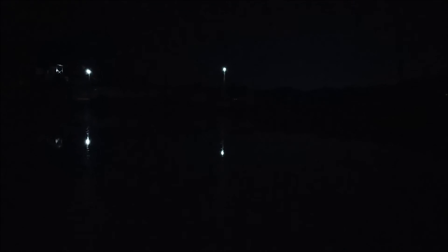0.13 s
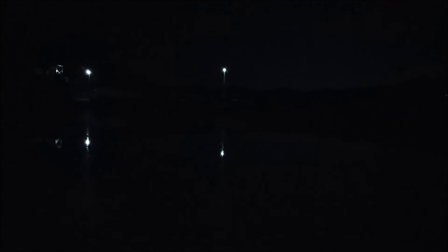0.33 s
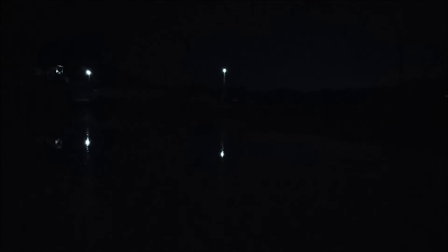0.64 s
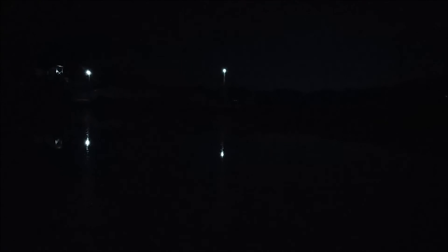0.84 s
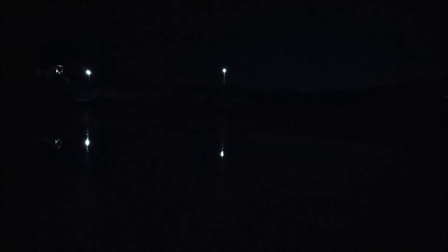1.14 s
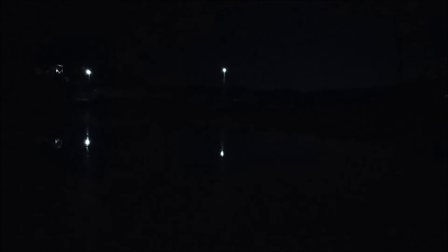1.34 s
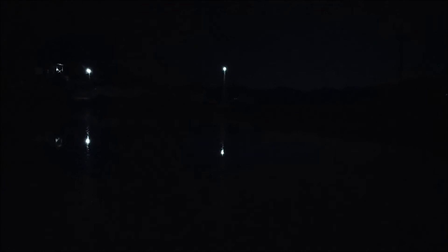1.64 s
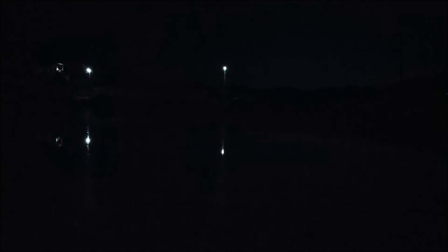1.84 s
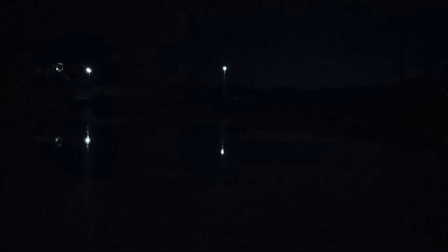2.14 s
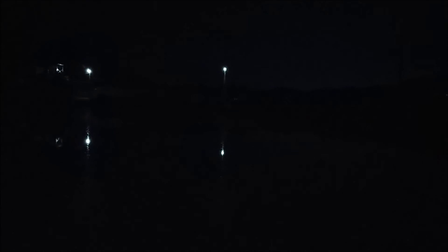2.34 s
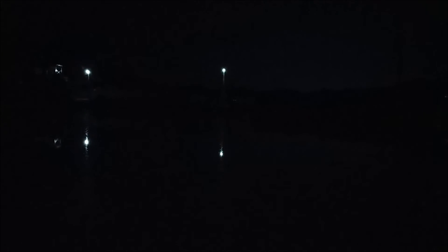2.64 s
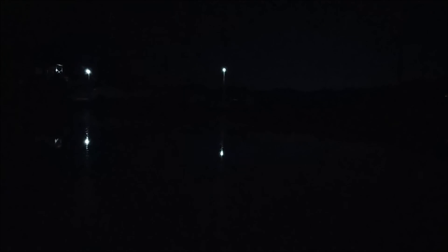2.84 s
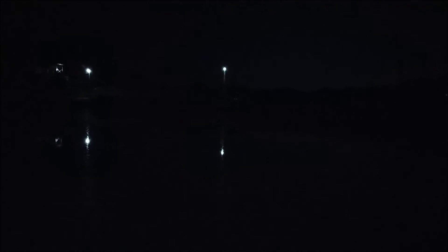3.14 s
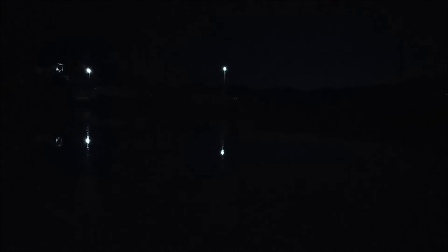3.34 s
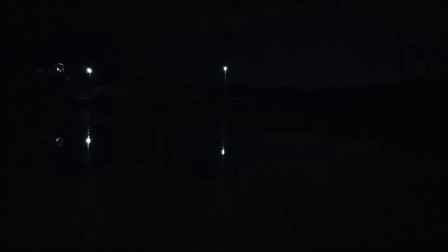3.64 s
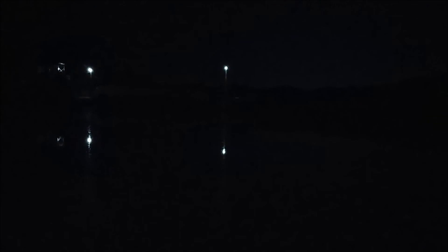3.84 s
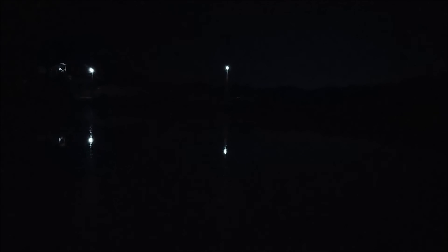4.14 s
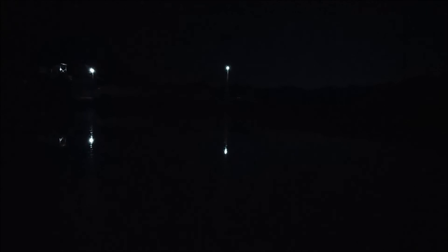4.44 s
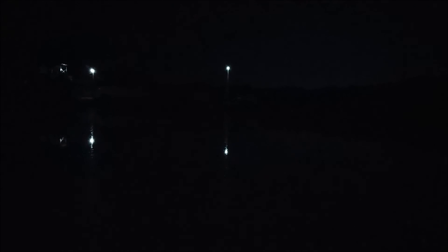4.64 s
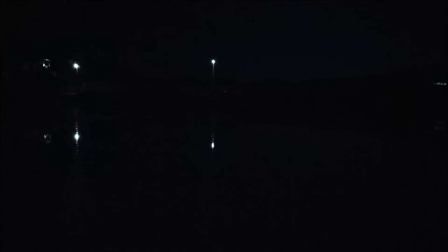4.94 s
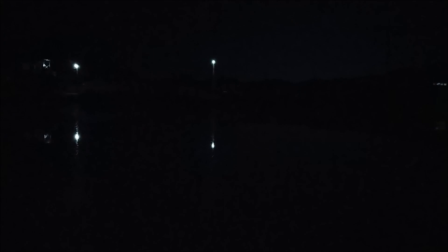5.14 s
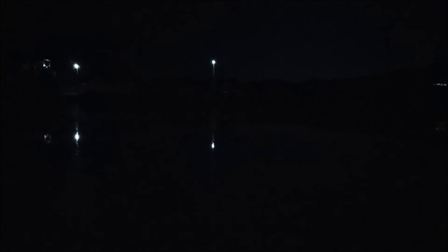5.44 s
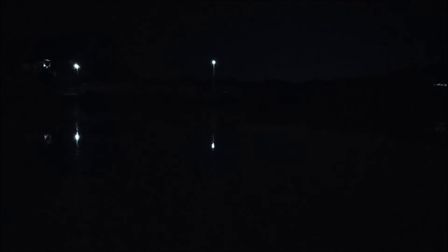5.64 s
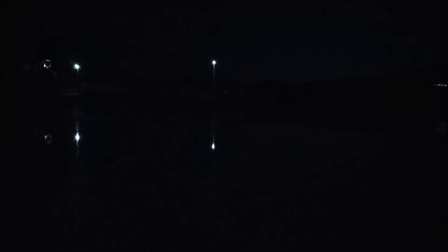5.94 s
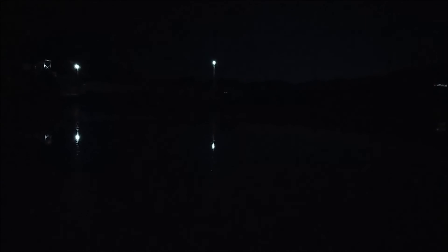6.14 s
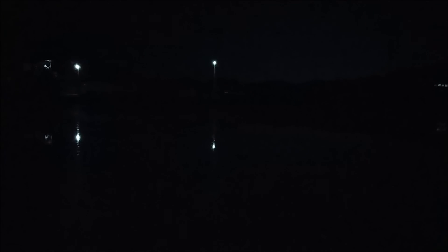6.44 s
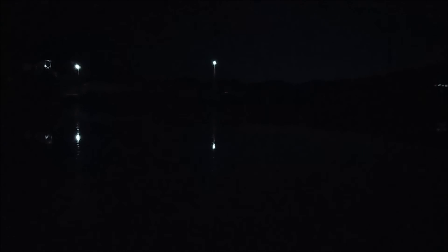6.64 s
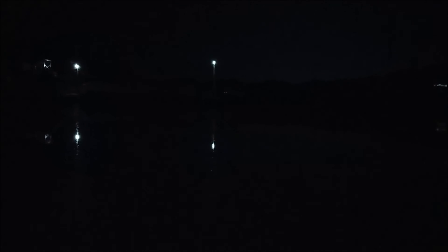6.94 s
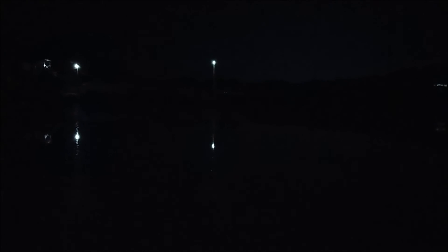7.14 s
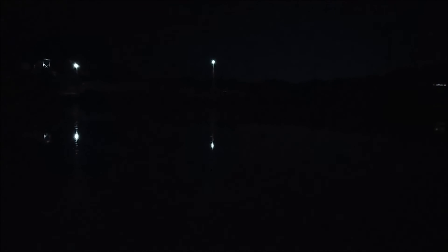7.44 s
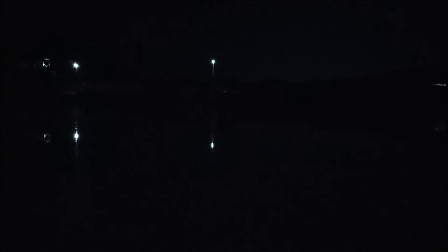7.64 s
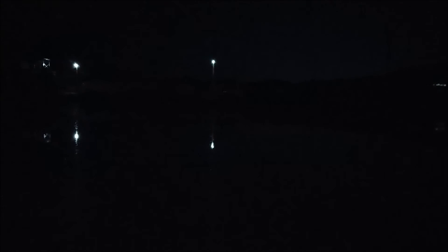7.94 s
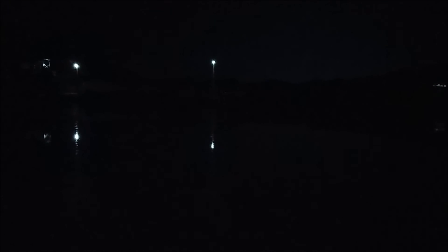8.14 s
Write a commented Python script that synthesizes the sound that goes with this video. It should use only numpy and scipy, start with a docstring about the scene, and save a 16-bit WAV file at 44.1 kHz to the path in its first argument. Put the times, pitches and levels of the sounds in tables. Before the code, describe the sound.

A dense night chorus of many small frogs croaking in quick rattling pulses over still water, one very near on the right, with faint hiss.

```python
"""Still water at night, with a frog chorus: each croak is a quick train of pulses ringing in throat and sac.
Five frogs stand out, one of them very near, and louder far croaks rise from the banks on either side.
Sixteen far frogs form a mass that draws back after the loud croaks; noise echoes scatter all the frogs.
Filtered noise makes a low far-off rumble, a brief whine, a faint hum and steady hiss.
The hand holding the microphone brushes it once, with two soft bumps."""
import sys
import numpy as np
from scipy import signal
from scipy.fft import rfft, irfft, next_fast_len
from scipy.io import wavfile
from scipy.ndimage import uniform_filter1d

SR = 44100
rng = np.random.default_rng(int(sys.argv[2]) if len(sys.argv) > 2 else 0)


def write(x):
    x = np.atleast_2d(x).T
    wavfile.write(sys.argv[1], SR, np.round(np.clip(x, -1, 1) * 32767).astype(np.int16))

N = 366030
TIME = np.arange(N) / SR

# Far rumble over time, then its drop as the hand shifts and the trace that returns: (time [s], level [dB])
RUMBLE_LEVEL = [(0.0, -67), (0.04, -63), (1.42, -60), (1.46, -52), (1.54, -58.5), (2.81, -55.5),
                (3.18, -60.5), (4.01, -55.5), (4.33, -61.5), (4.8, -60)]
RUMBLE_END = [(4.83, -58), (4.88, -76), (8.3, -68.5)]
# Faint hum and brief whine over time: (time [s], level [dB])
HUM_LEVEL = [(3.2, -92), (3.8, -70), (4.9, -74.5), (5.6, -72.5), (6.1, -84)]
WHINE_LEVEL = [(3.1, -88), (3.5, -65), (4.1, -69), (4.5, -90)]
# Spectra of the rumble and of the night air and microphone hiss: (frequency [Hz], relative level per Hz [dB])
RUMBLE_COLOUR = [(30, -68), (110, -21), (195, -9.5), (240, 5.5), (300, 0.5), (380, -3.5), (470, 3.5),
                 (660, -7.5), (800, -4), (1400, -29.5)]
HISS_COLOUR = [(30, -69), (70, -41), (125, -21), (200, 0), (600, 4.5), (1000, 10), (2500, 4), (7000, -5),
               (12500, -18.5), (15500, -18.5)]

# Resonances of each voice: (frequency [Hz], width [Hz], relative level [dB])
FAR_VOICE = [(1409, 192, -7.5), (1652, 310, -7), (2660, 1180, -12.5), (3088, 226, 4), (3940, 2200, -65),
             (4240, 850, -22), (5560, 610, -27.5), (8400, 13300, -38)]
BRIGHT_VOICE = [(1490, 110, 3.5), (1706, 180, -2), (3220, 282, 11), (3780, 163, 5.5), (4490, 340, -16),
                (6560, 2200, -25.5)]
BRIGHT_OVERTONE = [(8250, 410, 0)]
THIN_VOICE = [(1350, 530, -8.5), (3035, 340, 6), (4630, 1700, -20), (6270, 165, -16)]
NEAR_VOICE = [(1555, 267, -3.5), (3212, 343, -2.5), (3900, 690, -14), (4690, 374, -16)]
NEAR_OVERTONES = [(6630, 900, -21.5), (8700, 2900, -27), (9810, 324, -20.5), (10600, 3200, -36.5),
                  (14200, 3100, -33)]
DEEP_VOICE = [(1400, 920, -2), (3000, 330, 1), (4100, 1600, -36), (5716, 290, -4.5)]
HARSH_VOICE = [(1490, 230, 7.5), (1817, 290, 4), (2460, 570, -32), (3180, 274, 13.5), (3800, 1100, -21.5),
               (4620, 340, -10.5), (6100, 1300, -27), (8440, 350, -23.5)]
LEFT_FAR_VOICE = [(1380, 220, -14), (3027, 290, 0), (4270, 1130, -25), (5800, 560, -49)]

# Croaks of single frogs, timed at the climax: (time [s], relative level [dB])
BRIGHT_CROAKS = [(.02, -27), (.48, -25.5), (.945, -23.5), (1.39, -27), (1.835, -26), (2.30, -26),
                 (3.745, -24), (4.30, -26.5), (5.15, -25.5), (5.635, -29), (5.935, -25.5), (6.82, -25.5),
                 (7.09, -23.5), (7.45, -21.5), (7.93, -22), (8.195, -24.5)]
THIN_CROAKS = [(.10, -28.5), (.28, -29), (.83, -33), (1.31, -30.5), (1.655, -27), (1.89, -32),
               (2.155, -33.5), (2.95, -27), (3.19, -29), (6.43, -42)]
DEEP_CROAKS = [(.25, -38), (.88, -36), (1.215, -34), (1.94, -35), (2.375, -33.5), (2.73, -31),
               (3.05, -38.5), (3.38, -37.5), (3.705, -35.5), (4.055, -37.5), (4.355, -34), (4.655, -35.5),
               (5.21, -34)]
# Louder far croaks on the left: (time [s], relative level [dB])
LEFT_FAR_CROAKS = [(3.292, -24.5), (4.18, -23), (4.49, -23.5), (4.81, -19), (4.995, -24), (5.865, -25),
                   (6.35, -30.5), (7.405, -31), (8.285, -26.5)]
# Croaks with a pulse rate of their own: (time [s], relative level [dB], nominal pulse rate [Hz])
NEAR_CROAKS = [(0.1911, -20, 161.5), (0.6314, -19.5, 157.8), (1.1211, -21, 158.4), (1.5607, -19.5, 163.9),
               (2.0093, -20, 163.6), (2.4487, -19, 163.3), (2.7909, -18.5, 159.3), (3.1218, -19.5, 164.5),
               (3.5041, -19.5, 163.6), (3.9961, -20, 163.7), (5.076, -21, 169.8), (5.4136, -21, 168.6),
               (5.715, -19.5, 170.4), (7.2609, -21.5, 171.2), (7.6798, -19, 163.6), (7.965, -17.5, 164.8),
               (8.345, -19.5, 163.7)]
HARSH_CROAKS = [(2.562, -25, 205), (3.322, -25.5, 198.2), (5.224, -28.5, 200.7), (5.592, -27, 191.7),
                (5.885, -25, 189.9), (6.185, -24.5, 185.6), (6.515, -25.5, 184), (7.435, -23.5, 198.8),
                (8.139, -24.5, 203.6)]
# Single bank croaks: (time [s], relative level [dB], bearing [-1 left to 1 right])
BANK_CROAKS = [(.42, -31, -0.82), (0.899, -29, 0.96), (1.463, -23, -0.95), (1.87, -22, -0.89),
               (2.259, -22, 0.87), (3.67, -27, -0.96), (3.811, -22.5, 0.95), (4.119, -23, 0.89),
               (4.351, -30, -0.71), (4.645, -25, 0.67), (6.007, -30, 1), (6.24, -26.5, -.9),
               (6.60, -27.5, -0.77), (6.77, -25, -0.81), (6.96, -28, 0.69), (7.79, -27.5, 0.58),
               (8.209, -28.5, 0.77)]

# Brief dips of the far chorus; a negative depth is a lift: (time [s], depth [dB])
LULLS = [(.06, 2.5), (.335, -0.5), (.72, 3), (3.21, 4.5), (3.89, 5.5), (4.22, 2.5), (4.42, 3), (4.55, 2.5),
         (4.94, 3.5), (5.79, 4.5), (6.31, 7), (6.69, 5), (7.52, 4), (7.86, 5.5)]
# Low-pass curves that single out the lower ring of two frogs: (frequency [Hz], gain [dB])
NEAR_LOWER_RING = [(1850, 0), (2300, -45)]
HARSH_LOWER_RING = [(1650, -4.5), (1950, -42.0)]
# Shadow over the left port for the near frog: (frequency [Hz], gain [dB])
LEFT_SHADOW = [(4500, 1.5), (7000, -6.5), (9000, -6.0), (11000, -6.5)]

# Skin brushing the casing: (time [s], level [dB])
STROKE_LEVEL = [(4.6, -110), (4.69, -70), (4.74, -53), (4.78, -42),
                (4.8, -55), (4.832, -54), (4.855, -88), (4.9, -110)]
# Soft bumps of the hand: (time [s], level [dB])
BUMPS = [(3.945, -67), (4.835, -66)]
# How differently the microphone's two ports hear: (frequency [Hz], left minus right [dB])
PORT_BALANCE = [(900, 0.5), (1300, 2.5), (1550, 2.5), (1850, -2), (2200, 2.5), (3000, -1), (3500, -4.5),
                (4400, -2.5), (6000, -2), (8300, -3), (11000, -0.5)]

PORT_LAG_S, CUTOFF_HZ = .00049, 15750   # travel time from port to port; upper limit of the sound's band
TUNING_SCATTER = .006   # random detuning from pulse to pulse, as a share of pitch
CHORUS_DB, HUSH_DB, HUSH_DELAY_S = -29.5, 2.5, .08   # chorus level; its dip after a loud croak, and the delay
HUSH_S, LULL_S = .031, .042   # half-widths of the bell-shaped dips


def from_db(db):
    """Turn decibels into gain."""
    return 10 ** (np.asarray(db) / 20)


def rms_one(x):
    """Scale to unit power."""
    return x / np.sqrt(np.mean(x ** 2) + 1e-20)


def level(rows):
    """Draw a gain over time from (time [s], level [dB]) rows."""
    return from_db(np.interp(TIME, *np.transpose(rows)))


def band(x, low_hz, high_hz, order=2):
    """Butterworth band-pass."""
    edges = [low_hz, min(high_hz, .45 * SR)]
    return signal.sosfilt(signal.butter(order, edges, "band", fs=SR, output="sos"), x)


def coloured(x, points, power=1):
    """Equalise by a (frequency [Hz], gain [dB]) curve along log frequency; power scales its dB."""
    size = next_fast_len(N + SR // 10, real=True)
    hz, db = np.transpose(points)
    bins_hz = np.arange(size // 2 + 1) * SR / size
    curve = np.interp(np.log1p(bins_hz), np.log(hz), db)
    return irfft(rfft(x, size) * from_db(power * curve), size)[..., :N]


def stereo_noise(side_db):
    """White noise, partly shared by the two ports."""
    mid, side = rng.standard_normal((2, N))
    side = from_db(side_db) * side
    return np.array([mid + side, mid - side])


def place(x, bearing, pan_db):
    """Bearing -1 (left) to 1 (right): the far port hears later; pan_db is left minus right."""
    lag = round(bearing * PORT_LAG_S * SR / 2)
    left = np.roll(x, lag) * from_db(pan_db / 2)
    right = np.roll(x, -lag) * from_db(-pan_db / 2)
    return np.array([left, right])


def bells(times, height_db, width_s):
    """Smooth bell curves around the given moments, in dB over time."""
    coarse = TIME[::100]
    shapes = np.exp(-((coarse[:, None] - times) / width_s) ** 2)
    return np.interp(TIME, coarse, np.sum(height_db * shapes, axis=1))


def pulse(voice, size=320):
    """One snap of the vocal folds: each resonance builds up and dies within milliseconds; peak 1."""
    t = np.arange(size) / SR
    hz, width, db = np.transpose(voice)[:, :, None]
    damping = 3 / 2 * np.pi * width
    envelope = damping ** 2 * t * np.exp(-damping * t)
    wave = np.sum(from_db(db) * envelope * np.sin(2 * np.pi * hz * t), axis=0)
    # so small a body radiates no bass
    wave = band(wave, low_hz=1205, high_hz=max(9000, 0.962 * hz.max()), order=7)
    return wave / np.abs(wave).max()


def croaking(croaks, voice, pulse_hz, swell_s, release_s, glide, quicken, jitter, uneven_db,
             squareness=2, stop=2, bend=2.0, warm_up=0, whim=0.0148, count=24):
    """Pulses swell to a climax and stop; as pressure builds they quicken and their ring glides.

    squareness and stop sharpen the two edges; glide and quicken are shares per swell, and bend levels
    the glide off; jitter is a share of the pulse interval. The pulse rate creeps up by warm_up
    (share per s) as the frog warms to its calling, and varies by whim from croak to croak."""
    climax, peak_db = np.transpose(croaks)[:2, :, None]
    timing, strength, tuning, haste = rng.standard_normal((len(croaks), 4, count)).transpose(1, 0, 2)
    rate = pulse_hz * np.exp(warm_up * climax + whim * haste[:, :1])
    t = (np.arange(count) - 2 * count // 3) / rate   # about two thirds of the pulses lead to the climax
    progress = np.clip(t / swell_s, -1.3, 1)
    swell = np.abs(t / swell_s) ** squareness
    release = np.abs(t / release_s) ** stop
    shape = np.exp(-np.where(t < 0, swell, release))
    gain = from_db(peak_db + uneven_db * strength) * shape
    start = (climax + t * (1 - quicken * progress) + jitter * timing / rate) * SR
    stretch = 1 - glide * (np.exp(-bend * progress) - 1) / np.expm1(bend) + TUNING_SCATTER * tuning
    wave = pulse(voice)
    fine = signal.resample_poly(wave, 4, 1)   # read between samples without dulling
    fine_at = np.linspace(0, len(wave), len(fine), endpoint=False)
    at = np.ceil(start).astype(int)[..., None] + np.arange(len(wave))
    age = (at - start[..., None]) * stretch[..., None]
    rings = gain[..., None] * np.interp(age, fine_at, fine, right=0)
    inside = (at >= 0) & (at < N)
    return np.bincount(at[inside], rings[inside], N)


def rasp(x, low_hz, high_hz, smoothing_s=.0005):
    """Each pulse lets through a puff of turbulent air, which rings in the same band of the throat."""
    power = uniform_filter1d(band(x, low_hz, high_hz) ** 2, max(2, int(smoothing_s * SR)))
    turbulence = rms_one(band(rng.standard_normal(N), low_hz, high_hz, order=4))
    puffs = np.sqrt(np.abs(power)) * turbulence
    return band(puffs, low_hz, high_hz)


def vocal_sac(x, hz, width_hz, boost_db):
    """The sac has a fixed resonance: a croak blooms as its ring glides into it."""
    ringing = signal.lfilter(*signal.iirpeak(hz, hz / width_hz, fs=SR), x + 1e-18)
    return x + (from_db(boost_db) - 1) * ringing


def shore(x, reeds_db, banks_db, reeds_t60, banks_t60, dull_hz):
    """Quick scatter from reeds and ground, then a faint tail from the banks; both lose treble."""
    t = TIME[:SR // 2]
    reeds, banks = rng.standard_normal((2, 2, len(t))) * (t > .0015)
    echo = 0
    for noise, db, t60 in ((reeds, reeds_db, reeds_t60), (banks, banks_db, banks_t60)):
        decay = np.exp(-np.log(1000) * t / t60)   # 60 dB down after t60 seconds
        echo = echo + from_db(db) * rms_one(noise * decay) / np.sqrt(len(t))
    return x + signal.oaconvolve(x, band(echo, 450, dull_hz, order=1), axes=1)[:, :N]


def background():
    """Coloured noise: a far rumble that drops away, a brief whine, a faint hum and steady hiss."""
    rumble = level(RUMBLE_LEVEL + RUMBLE_END) * rms_one(coloured(stereo_noise(side_db=-7.5), RUMBLE_COLOUR))
    hum = level(HUM_LEVEL) * rms_one(band(rng.standard_normal(N), 548, 564))
    hiss = from_db(-56.5) * rms_one(coloured(stereo_noise(side_db=-0.5), HISS_COLOUR))
    whine = level(WHINE_LEVEL) * rms_one(band(rng.standard_normal(N), 790, 850))
    return rumble + hum + whine + hiss


def far_frogs(count=16):
    """Frogs of many sizes along the banks to either side, each croaking about three times a second."""
    out = np.zeros((2, N))
    for k in range(count):
        side = (-1) ** k
        frog = far_frog(body=2 * k / count - 1)
        out += place(frog, bearing=side * rng.uniform(0.89, 1), pan_db=side * -1.5)
    out = shore(out, reeds_db=-5, banks_db=-10, reeds_t60=.06, banks_t60=.4, dull_hz=6500)
    loudness = np.sqrt(uniform_filter1d(np.mean(out ** 2, axis=0), SR // 12) + 1e-12)
    return chorus_effort() * out / loudness   # the whole chorus ebbs and recovers together


def far_frog(body, count=28):
    """One distant caller: body (-1 large to 1 small) sets its pitch, nearness its share of the mass."""
    nearness, pace = rng.uniform(-1, 1, 2)
    gaps, force = rng.standard_normal((2, count))
    times = np.cumsum(.37 + 0.046 * gaps) - rng.uniform(.37, .8)
    croaks = np.column_stack([times, 3 * nearness + 4 * force])
    voice = np.array(FAR_VOICE) * [np.exp(0.046 * body), 1, 1]
    return croaking(croaks, voice, pulse_hz=148 * np.exp(.17 * pace), whim=.08, swell_s=0.0501,
                    release_s=0.032, glide=0.081, bend=0.57, quicken=.06, jitter=0.02,
                    uneven_db=1.0, count=18)


def chorus_effort():
    """Steady calling, less the hush after each near or harsh croak and the shared lulls."""
    loud_s = np.array(NEAR_CROAKS + HARSH_CROAKS)[:, 0]
    hush = bells(loud_s + HUSH_DELAY_S, HUSH_DB, HUSH_S)
    lulls = bells(*np.transpose(LULLS), LULL_S)
    return from_db(CHORUS_DB - hush - lulls)


def neighbours():
    """Four frogs with voices and rhythms of their own, and louder far croaks, scattered by one shore."""
    harsh = harsh_frog()
    # the lower ring reaches the two ports with less delay between them
    body = coloured(harsh, HARSH_LOWER_RING)
    direct = place(body, bearing=-0.84, pan_db=-2.0) + place(harsh - body, bearing=-1, pan_db=-.5)
    direct = from_db(4.0) * direct
    direct += place(bright_frog(), bearing=0.95, pan_db=0.0)
    direct += place(deep_frog(), bearing=0.97, pan_db=-4.0)
    direct += place(thin_frog(), bearing=-0.89, pan_db=-3.0)
    direct += place(left_far_croaks(), bearing=-0.99, pan_db=-1.0)
    wet = shore(direct, reeds_db=-3.5, banks_db=-13, reeds_t60=.045, banks_t60=.25, dull_hz=7000)
    return from_db(4.5) * wet


def bright_frog():
    """Narrow, clear resonances and a high overtone; the pulses gradually speed up from croak to croak."""
    ring = croaking(BRIGHT_CROAKS, BRIGHT_VOICE, pulse_hz=133.3, warm_up=.024, swell_s=.064,
                    release_s=0.022, stop=3, glide=0.085, bend=.4, quicken=0.043, jitter=0.015,
                    uneven_db=1.0)
    overtone = croaking(BRIGHT_CROAKS, BRIGHT_OVERTONE, pulse_hz=133.3, warm_up=0.027, swell_s=0.047,
                        release_s=0.024, glide=0.057, quicken=0.03, jitter=0.02, uneven_db=1.5,
                        squareness=2.7)
    return ring + from_db(-24.5) * overtone


def thin_frog():
    """Even pulses whose ring does not glide, strongest near 3 kHz."""
    return croaking(THIN_CROAKS, THIN_VOICE, pulse_hz=133.7, swell_s=0.055, release_s=0.028,
                    glide=0, quicken=0.0337, jitter=0.029, uneven_db=0.0)


def near_frog():
    """The loudest, close on the right: overtones start abruptly as the main ring swells and sweeps up."""
    climax_s, _, pulse_hz = np.transpose(NEAR_CROAKS)
    pulsing = dict(pulse_hz=pulse_hz[:, None], quicken=.085, jitter=.008, whim=0)
    x = croaking(NEAR_CROAKS, NEAR_VOICE, swell_s=.062, release_s=.021, stop=4, glide=.105, bend=.9,
                 uneven_db=.7, squareness=2.5, **pulsing)
    x = x + from_db(-10) * rasp(x, low_hz=1250, high_hz=1850, smoothing_s=.003)
    x = x + from_db(-12) * rasp(x, low_hz=2750, high_hz=3700, smoothing_s=.001)
    inflation_db = bells(climax_s, height_db=3.5, width_s=0.091)   # the sac is tautest at the climax
    x = vocal_sac(x, hz=3270, width_hz=380, boost_db=4 + inflation_db)
    x = from_db(1.5) * x
    top = croaking(NEAR_CROAKS, NEAR_OVERTONES, swell_s=.072, release_s=0.021, stop=2.9, glide=0.098,
                   uneven_db=2.0, squareness=6.3, **pulsing)
    top = from_db(-10.0) * top
    top = top + from_db(-6) * rasp(top, low_hz=5400, high_hz=13200, smoothing_s=.0025)
    # the lower ring reaches the two ports with more delay between them
    body = coloured(x, NEAR_LOWER_RING)
    direct = place(body, bearing=.85, pan_db=0)
    direct += place(x - body + top, bearing=.65, pan_db=0.0)
    direct[0] = coloured(direct[0], LEFT_SHADOW)
    return shore(direct, reeds_db=-3.5, banks_db=-17, reeds_t60=.022, banks_t60=.2, dull_hz=9000)


def deep_frog():
    """Uneven pulses at a slow rate, whose ring sinks slightly during the croak."""
    return croaking(DEEP_CROAKS, DEEP_VOICE, pulse_hz=130.0, swell_s=0.0575, release_s=0.023,
                    glide=-0.03, quicken=0.0264, jitter=0.0204, uneven_db=2.5, squareness=3.0)


def bank_frogs():
    """Now and then one frog on the bank calls louder than the rest."""
    out = np.zeros((2, N))
    for s, db, bearing in BANK_CROAKS:
        croak = croaking([(s, db)], FAR_VOICE, pulse_hz=146.6, whim=0.09, swell_s=0.0538,
                         release_s=0.026, glide=0.092, bend=.6, quicken=0.055, jitter=0.021,
                         uneven_db=3.0)
        out += place(croak, bearing, pan_db=bearing * -1.5)
    return from_db(1) * shore(out, reeds_db=-4, banks_db=-11, reeds_t60=.06, banks_t60=.45, dull_hz=6500)


def harsh_frog():
    """Fast pulses with a rasp of breath around the lower ring."""
    x = croaking(HARSH_CROAKS, HARSH_VOICE, pulse_hz=np.array(HARSH_CROAKS)[:, 2:], swell_s=0.055,
                 release_s=0.02, stop=3.5, glide=0.14, bend=.6, quicken=0.08, jitter=0.018,
                 uneven_db=1.5, squareness=3.8)
    return x + from_db(-10) * rasp(x, low_hz=1405, high_hz=2760, smoothing_s=.001)


def left_far_croaks():
    """Louder far croaks on the left: short, starting abruptly, with loosely timed pulses."""
    return croaking(LEFT_FAR_CROAKS, LEFT_FAR_VOICE, pulse_hz=142.4, swell_s=0.0435, release_s=0.014,
                    glide=0.047, quicken=0.0312, jitter=0.04, uneven_db=0.0, squareness=11)


def hand():
    """Skin brushes the casing as the grip shifts (grainy noise); two soft bumps (bursts of low noise)."""
    friction = rng.standard_normal((2, N)) * from_db(3 * rng.standard_normal(N))
    out = level(STROKE_LEVEL) * rms_one(band(friction, 1200, 14000, order=1))
    for s, db in BUMPS:
        thud = rms_one(band(rng.standard_normal(N), 25, 120))
        out += from_db(db) * thud * np.exp(-((TIME - s) / 0.008) ** 2)
    return out


def scene():
    """All callers, the night behind them and the hand."""
    frogs = near_frog() + neighbours() + bank_frogs() + far_frogs()
    return band(frogs, low_hz=500, high_hz=19000) + background() + hand()


def record(dry):
    """Each port has its own colour; the top is cut."""
    left = coloured(dry[0], PORT_BALANCE, power=1 / 2)
    right = coloured(dry[1], PORT_BALANCE, power=-1 / 2)
    top_cut = signal.ellip(12, .1, 90, CUTOFF_HZ, fs=SR, output="sos")
    return signal.sosfilt(top_cut, np.array([left, right]))


dry = scene()
out = record(dry)
write(out)
```